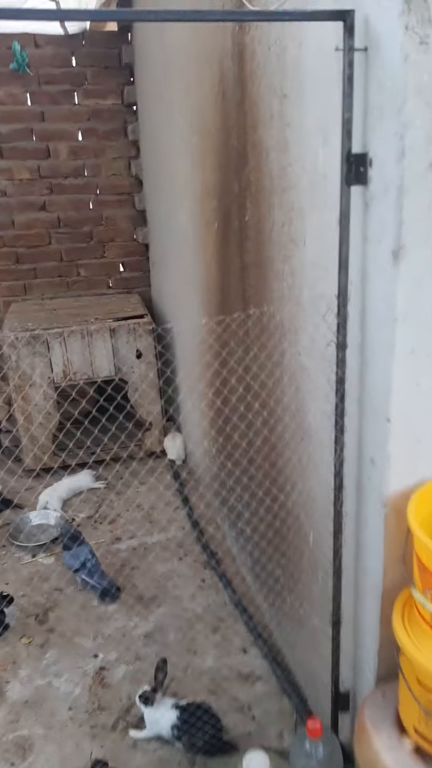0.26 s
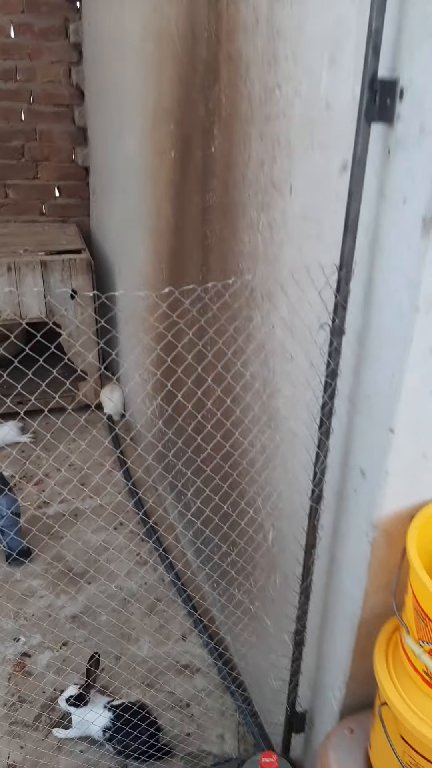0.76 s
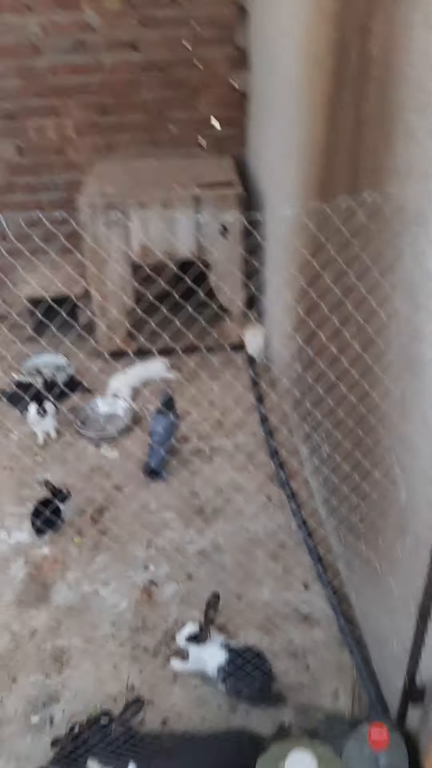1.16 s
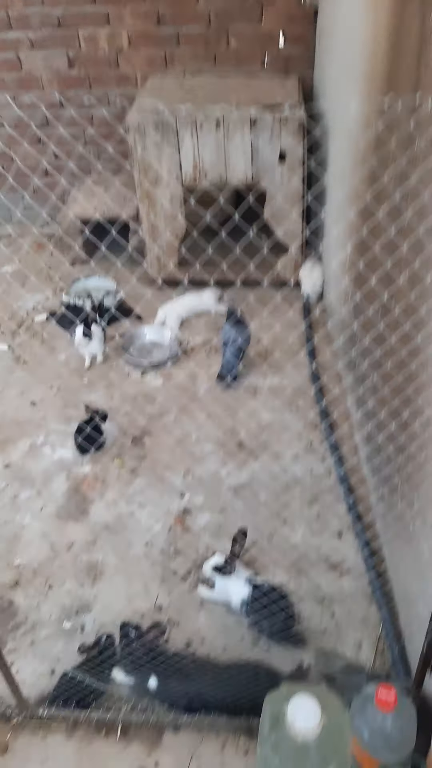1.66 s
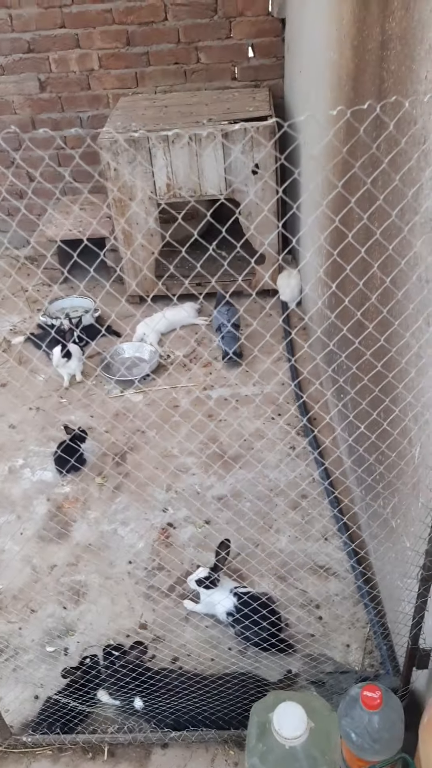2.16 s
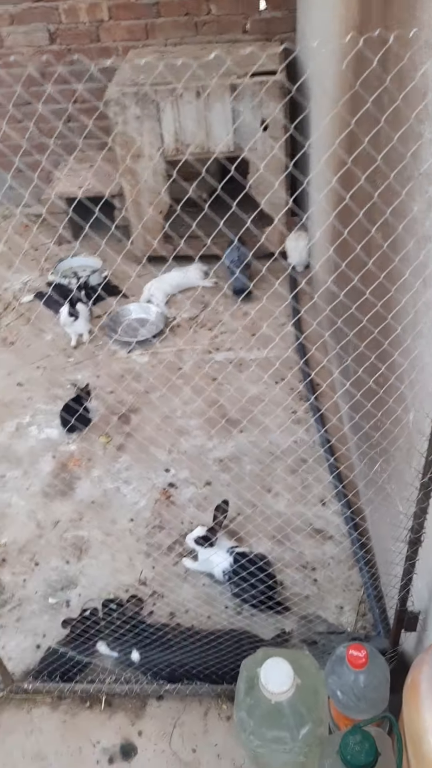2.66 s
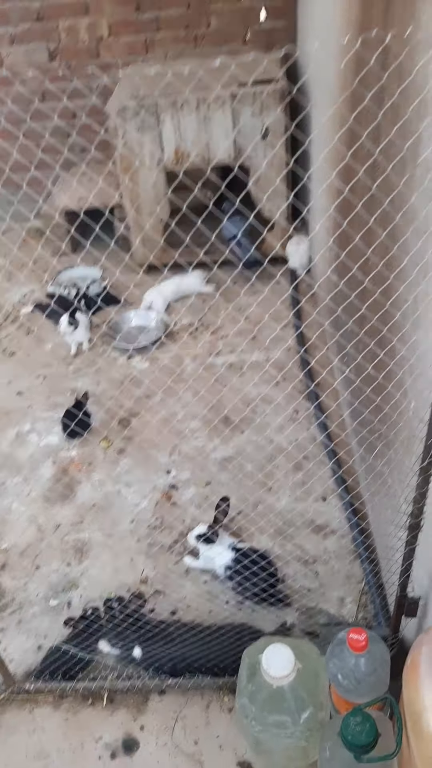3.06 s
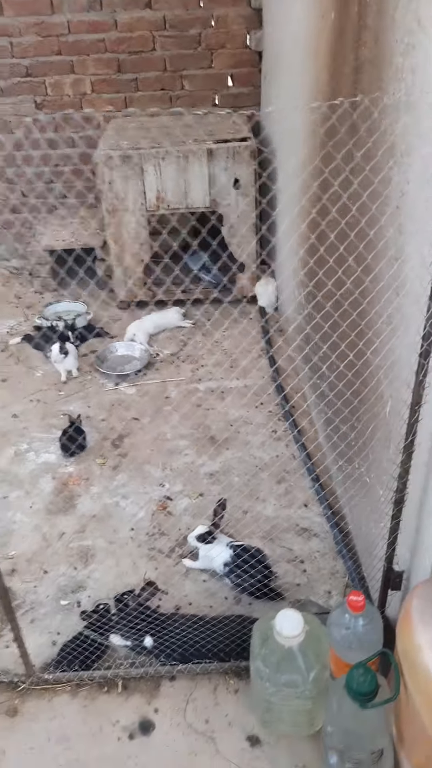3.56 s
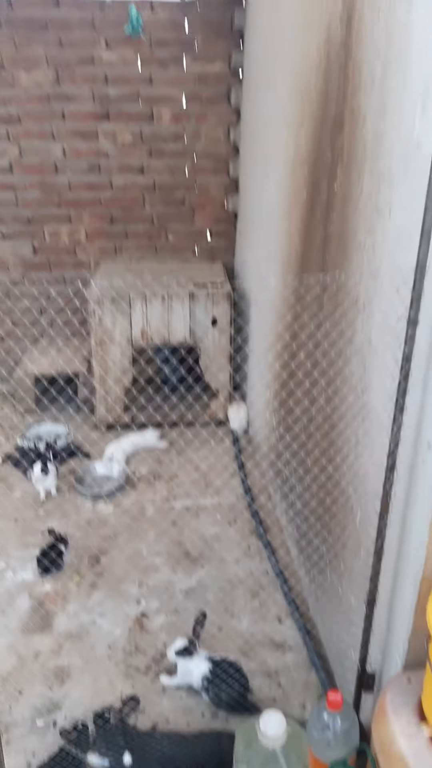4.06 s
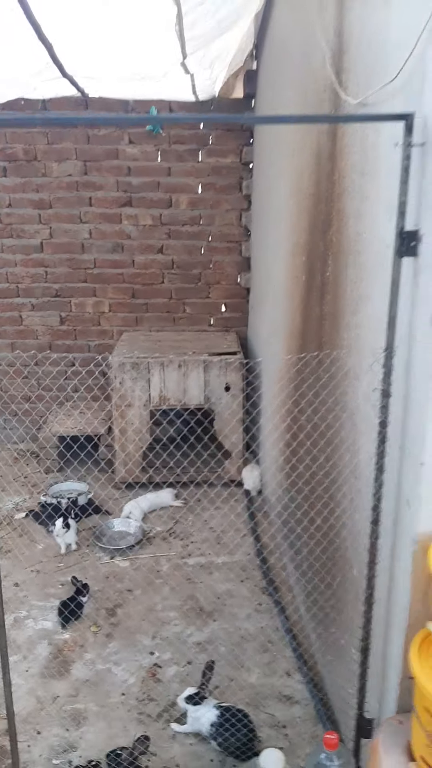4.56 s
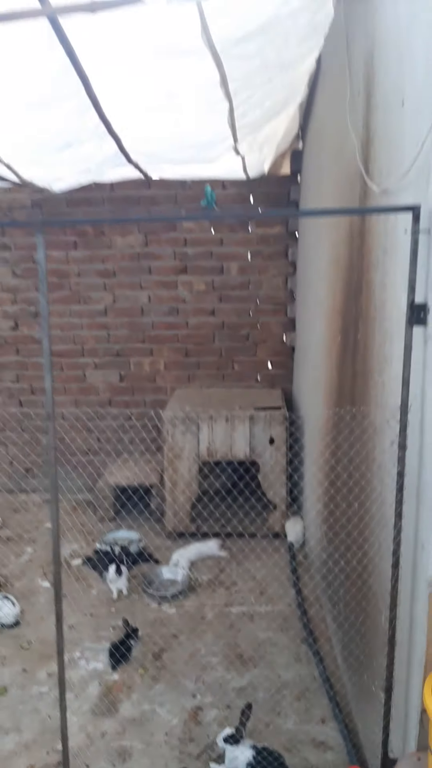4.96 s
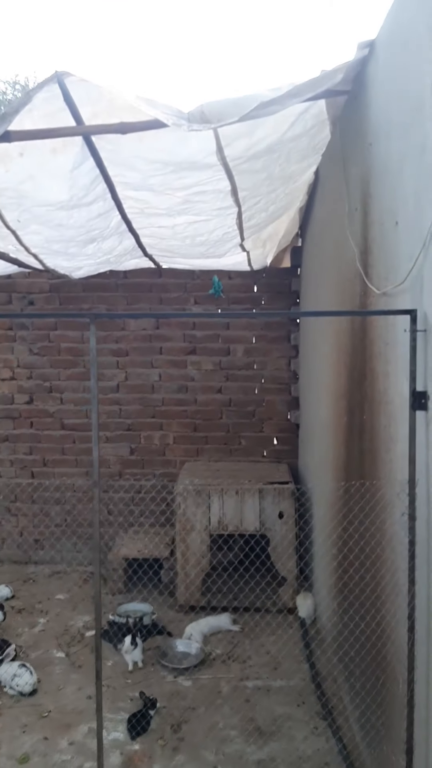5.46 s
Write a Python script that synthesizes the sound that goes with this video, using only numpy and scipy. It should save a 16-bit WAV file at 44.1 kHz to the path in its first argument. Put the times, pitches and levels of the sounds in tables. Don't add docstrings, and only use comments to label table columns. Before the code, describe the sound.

Pigeons land with wooden rattles and flapping feathers, sparrows whistle and squabble off brick walls, and a near coo swells at the very end.

```python
import sys
import numpy as np
from scipy import signal
from scipy.fft import rfft, irfft, next_fast_len
from scipy.io import wavfile
from scipy.ndimage import uniform_filter1d, map_coordinates

SR = 44100
rng = np.random.default_rng(int(sys.argv[2]) if len(sys.argv) > 2 else 0)


def to_wav(s):
    ch = np.atleast_2d(s).T
    pcm = np.round(np.clip(ch, -1, 1) * 32767)
    wavfile.write(sys.argv[1], SR, pcm.astype(np.int16))


def invert_db(x):
    u = np.asarray(x, float) / 20
    return 10 ** u


N = 252693


def rms_one(x):
    return x / np.sqrt(np.mean(x ** 2) + 1e-20)


def at_hz(points, hz):
    table_hz, value = np.transpose(points)
    return np.interp(np.log(hz), np.log(table_hz), value)


def drift(rate):
    knots = rng.standard_normal(N // 40 + 2002)
    r = np.exp(-80 * np.pi * rate / SR)
    slow = signal.lfilter([1], [1, -2 * r, r * r], knots)[2000:]
    return np.interp(np.arange(N) / 40, np.arange(len(slow)), rms_one(slow))


def resonance(x, hz, width_hz):
    r = np.exp(-np.pi * width_hz / SR)
    poles = [1, -2 * r * np.cos(2 * np.pi * hz / SR), r * r]
    return signal.lfilter([(1 - r * r) / 2, 0, (r * r - 1) / 2], poles, x + 1e-18)


def swell(s, rise, fall):
    at = np.arange(max(round((s - 4 * rise) * SR), 0), min(round((s + 8 * fall) * SR), N))
    t = at / SR - s
    return at, np.where(t < 0, np.exp(-.5 * (t / rise) ** 2), np.exp(-t / fall))


def soft_tones(puffs):
    out = np.zeros(N)
    for s, db, hz, rise, fall in puffs:
        at, shape = swell(s, rise, fall)
        out[at] += invert_db(db) * shape * np.cos(2 * np.pi * hz * (at / SR - s))
    return out


# (frequency [Hz], likeness [0-1])
PORT_LIKENESS = [(40, .8), (100, .94), (250, .955), (550, .75), (1200, .6), (3000, .3), (15000, .1)]


def coloured(spectrum):
    size = next_fast_len(N)
    hz = np.maximum(np.fft.rfftfreq(size, 1 / SR), 1)
    mid, side = rfft(rng.standard_normal((2, size)))
    alike = at_hz(PORT_LIKENESS, hz)
    ports = np.sqrt(1 + alike) * mid + np.sqrt(1 - alike) * side * [[1], [-1]]
    return rms_one(irfft(ports * invert_db(at_hz(spectrum, hz)), size)[:, :N])


# (frequency [Hz], density [dB per Hz])
YARD_COLOUR = [(15, -23), (25, -11), (97, 11), (200, 2), (285, -30), (575, -3.5), (1040, -5.5), (1520, -22),
               (3820, -18.5), (6380, -12.5), (8360, -23.5), (13200, -10), (16000, -33)]


def yard():
    yard_db, drone_hz, width_hz, drone_db = -74, 1050, 110, -82
    drone = resonance(rng.standard_normal(N), drone_hz, width_hz)
    drone = rms_one(resonance(drone, drone_hz, width_hz))
    swells_db = .8 * drift(3)
    air = invert_db(yard_db - 2.5 + swells_db) * coloured(YARD_COLOUR)
    return air + invert_db(drone_db + 0.5 * drift(2.3)) * drone


# (time [s], level [dB], rattle length [s], tail T60 [s], brightness [dB per octave])
LANDINGS = [(0.0, -33, 0.036, 0.92, 1), (0.925, -51.5, 0.12, 0.19, 0.84), (1.148, -77, 0.15, 0.23, 6.5),
            (2.301, -66.5, 0.097, 0.3, 1.5), (2.789, -52.5, 0.16, 0.35, -1.05),
            (3.269, -50, 0.076, 0.42, 0.36), (3.483, -71.5, 0.02, 0.31, -8.5),
            (3.733, -47, 0.095, 0.41, -1), (4.523, -49.5, 0.082, 0.45, 0.3), (4.85, -100, 0.11, 0.45, 13.5),
            (5.251, -45, 0.096, 0.49, -1.43), (5.424, -68, 0.092, 0.8, 4), (5.583, -57, 0.013, 0.76, -8.5),
            (5.606, -43.5, 0.09, 0.73, -0.4)]
# (frequency [Hz], density [dB per Hz])
BOARD_COLOUR = [(24, -50), (40, -21), (114, -5), (258, -0.5), (339, -7.5), (538, -8), (707, -9),
                (1100, -6.5), (2880, -28.5), (6000, -32), (7800, -31.5), (13200, -120)]
# (frequency [Hz], width [Hz], level [dB])
BOARD_MODES = [(120, 16, 2), (250, 30, 3), (305, 25, 0), (548, 30, 2), (950, 30, 1), (1125, 25, 4)]


def thumps():
    noise = coloured(BOARD_COLOUR)
    modes = sum(invert_db(db) * resonance(noise, hz, width) for hz, width, db in BOARD_MODES)
    noise = rms_one(noise + modes)
    edges = [58, 200, 450, 1000, 2200, 7000]
    rattle, t, out = invert_db(2.2 * drift(60)), np.arange(N) / SR, 0
    for low, high in zip(edges, edges[1:]):
        octaves = np.log2(np.sqrt(low * high) / 300)
        power_wanted = np.zeros(N)
        for s, db, length, t60, tilt_db in LANDINGS:
            start = round(s * SR)
            age = t[start:] - s
            attack_s = .003 * 2 ** (-.9 * octaves)
            attack = np.clip(age / attack_s + (s < .01), 0, 1)
            tail_db = -60 * np.maximum(age - length, 0) / (t60 * 2 ** (-.15 * octaves))
            power_wanted[start:] += (attack * invert_db(db + tilt_db * octaves + tail_db)) ** 2
        band = signal.sosfilt(signal.butter(2, [low, high], "band", fs=SR, output="sos"), noise)
        band = np.roll(band, round(2.1 * SR), axis=1)
        power = uniform_filter1d(np.mean(band ** 2, axis=0), size=1400)
        out = out + np.sqrt(power_wanted * power.mean() / power) * band
    return out * rattle


# (time [s], level [dB], frequency [Hz], rise [s], fall [s])
RINGING_BOARDS = [(.012, -40, 205, .004, .03), (.085, -42, 235, .008, .015), (.43, -57.5, 248, .03, .03),
                  (.006, -30, 251.6, 0.0019, 0.035), (.02, -37, 121, 0.0079, 0.024),
                  (.01, -44.5, 544, 0.0032, 0.063), (.18, -52, 287.5, 0.011, 0.036),
                  (.285, -50.5, 278.6, .012, 0.042), (3.747, -56, 203, .006, 0.05),
                  (5.27, -51.5, 452, 0.0081, 0.035), (5.295, -49, 297.4, 0.015, 0.083),
                  (5.3, -50, 143, 0.032, 0.035), (5.615, -50, 110, 0.0073, .04)]


def booms():
    return soft_tones(RINGING_BOARDS)


# (time [s], level [dB])
FEATHERS = [(0.0, -72), (.25, -54.5), (.32, -90), (.43, -60), (.78, -68.5), (1.0, -51), (1.12, -71.5),
            (1.43, -68.5), (2.05, -120), (2.33, -65.5), (2.8, -88.5), (2.9, -70), (3.5, -69.5),
            (3.77, -62.5), (4.52, -70.5), (4.87, -65), (5.43, -75.5), (5.73, -74)]
# (time [s], shuffle level [dB], low scuffle over shuffle [dB])
FEET = [(0.0, -42, 6), (.16, -51.5, -19), (.27, -54, 2), (0.351, -65.5, 7), (1.0, -79, 3.5),
        (1.12, -82, 11.5), (1.29, -67, 2), (1.45, -66, -6), (1.5, -80, 10), (1.9, -78, 4.5),
        (2.1, -82.5, 6), (2.73, -80.5, 6), (2.9, -83.5, 12.5), (3.22, -75.5, 4.5), (4.36, -75, 0.5),
        (5.2, -67.5, -5), (5.46, -85.5, 27), (5.73, -62.5, -7)]
# (frequency [Hz], density [dB per Hz])
FEATHER_COLOUR = [(1180, -16.5), (2000, -5), (2460, -6.5), (2830, -5), (3910, -1), (4230, -2), (4820, -3.5),
                  (6640, 0.5), (8780, -14.5), (15200, -4.5), (16000, -46)]
# (frequency [Hz], density [dB per Hz])
SHUFFLE_COLOUR = [(500, -11), (900, 13.5), (1300, 8.5), (1900, 7), (2600, 5), (4000, -26)]
# (frequency [Hz], density [dB per Hz])
SCUFFLE_COLOUR = [(120, -3), (250, 2.5), (450, 0), (700, -9), (1200, -28.5)]


def rustle():
    kick_rise_s, kick_fall_s = 0.029, 0.096
    shuffle_kick_db, scuffle_kick_db = -15.5, -11.5
    t, kicked, out = np.arange(N) / SR, np.zeros(N), 0
    for s, db, *_ in LANDINGS:
        at, shape = swell(s + kick_rise_s, kick_rise_s / 2, kick_fall_s)
        kicked[at] += invert_db(db) * shape
    s, pace_db, weight_db = np.transpose(FEET)
    feathers = invert_db(np.interp(t, *np.transpose(FEATHERS)))
    shuffle = np.hypot(invert_db(np.interp(t, s, pace_db)), invert_db(shuffle_kick_db) * kicked)
    scuffle = np.hypot(invert_db(np.interp(t, s, pace_db + weight_db)), invert_db(scuffle_kick_db) * kicked)
    layers = (FEATHER_COLOUR, feathers), (SHUFFLE_COLOUR, shuffle), (SCUFFLE_COLOUR, scuffle)
    for spectrum, level in layers:
        patches_db = 1.3 * drift(14)
        out = out + coloured(spectrum) * level * invert_db(-1.5 + patches_db)
    return out


# (peak time [s], air level [dB], fall [s], hollow frequency [Hz],
# hollow level [dB])
STROKES = [(.05, -62, 0.062, 1630, -50.5), (.35, -78, .3, 1720, -88), (.612, -59, 0.13, 1930, -63),
           (.898, -49.5, 0.018, 6500, -72), (.973, -57, 0.022, 2390, -38.5), (1.2, -65.5, 0.044, 4900, -83),
           (1.94, -74, 0.068, 435, -60.5), (.935, -90, 0.045, 1950, -51.5), (1.905, -90, .03, 14000, -57.5),
           (2.94, -86, 0.048, 800, -62), (5.69, -90, 0.034, 517, -51), (2.23, -94, 0.11, 4400, -71.5),
           (2.931, -62, 0.014, 724, -47.5), (3.292, -53, 0.0086, 6100, -52), (3.5, -98, 0.088, 655, -65.5),
           (4.57, -95, 0.079, 1950, -66), (4.819, -59, 0.0074, 6000, -62), (5.21, -64, 0.029, 6300, -81)]
# (peak time [s], air level [dB], fall [s], hollow frequency [Hz], hollow level [dB])
SWISHES = [(4.12, -90, 0.14, 12000, -72), (3.8, -90, .1, 12000, -70), (.309, -57.5, 0.049, 5630, -56),
           (1.003, -54, 0.013, 2460, -43), (1.62, -72, 0.11, 4100, -64), (1.9, -59.5, 0.026, 6500, -60.5),
           (1.926, -67, 0.016, 676, -55), (2.79, -81, 0.18, 6300, -83), (3.189, -61, 0.029, 5200, -65),
           (3.82, -61, 0.015, 2300, -63), (3.88, -61, 0.011, 1570, -63), (4.018, -61.5, 0.052, 5000, -70),
           (4.348, -64, 0.039, 696, -78), (5.409, -62, 0.034, 1720, -61.5)]
# (peak time [s], air level [dB], fall [s], hollow frequency [Hz], hollow level [dB])
CLAPS = [
    (.929, -52.5, 0.09, 1890, -63),
    (1.6, -73, 0.041, 6540, -68),
    (2.918, -49.5, 0.018, 6040, -47.5),
    (4.865, -62, 0.029, 6960, -81),
]


def wings():
    air, out = coloured(FEATHER_COLOUR) * invert_db(1.6 * drift(75)), np.zeros((2, N))
    white = coloured([(100, 0), (16000, 0)])
    for beats, rise_share in ((CLAPS, 0.092), (STROKES, 0.4), (SWISHES, 0.73)):
        for s, air_db, fall, hz, hollow_db in beats:
            at, shape = swell(s, rise_share * fall, fall)
            hollow = resonance(resonance(white[:, at], hz, 0.54 * hz), hz, 0.54 * hz)
            out[:, at] += shape * (invert_db(air_db) * air[:, at] + invert_db(hollow_db) * rms_one(hollow))
    return out


# (time [s], crack level [dB], knock level [dB], crack centre [Hz])
TICKS = [(.16, -42, -80, 6500), (.1775, -43, -80, 6500), (.056, -50, -80, 6000), (.082, -46, -80, 12500),
         (1.1394, -70, -55, 1500), (2.0017, -68, -62, 2500), (2.18, -59, -70, 5000),
         (2.325, -56, -53, 3000), (2.917, -45, -60, 9000), (3.261, -55, -52, 1500), (3.29, -52, -70, 9000),
         (3.589, -55, -75, 9000), (3.875, -56, -75, 7000), (4.06, -70, -60, 1500), (4.14, -55, -75, 10000),
         (4.295, -56, -56, 3000), (4.3384, -50, -47, 3000), (4.5105, -43, -62, 12500),
         (4.5246, -56, -54, 2500), (4.6124, -56, -66, 2500), (4.668, -54, -75, 7000),
         (5.2565, -55, -47, 1500), (5.604, -60, -52, 1800)]


def ticks():
    size = 600
    out, t = np.zeros(N + size), np.arange(size) / SR
    knock = np.sin(2 * np.pi * 750 * t) * np.exp(-t / .001)
    for s, crack_db, knock_db, hz in TICKS:
        crack = resonance(rng.standard_normal(size) * np.exp(-t / .0005), hz, 1.1 * hz)
        start = round(s * SR)
        out[start:start + size] += invert_db(crack_db) * crack / np.abs(crack).max() + invert_db(knock_db) * knock
    return (out - resonance(out, 9000, 3500))[:N]


def walls(x, smear=1.8):
    t60_s, smear_hz = .31, 150
    t = np.arange(round(.6 * SR)) / SR
    onset = np.clip(t / .005, 0, 1)
    echoes = rng.standard_normal((2, len(t))) * invert_db(-60 * t / t60_s) * onset
    mid, side = (part / np.sqrt(uniform_filter1d(np.abs(part) ** 2, size=50)) for part in rfft(echoes))
    echoes = irfft([mid + side, mid - side], len(t)) * onset * (t < .5)
    echoes /= np.sqrt(np.sum(echoes ** 2, axis=1, keepdims=True))
    x = map_coordinates(x, [np.arange(N) + smear * drift(smear_hz)], order=3)
    return signal.fftconvolve(x[None], echoes, axes=1)[:, :N]


def sing(notes, turn, bend, wobble_hz, flutter_db, glide_loss_db, softness=.7):
    out, wobble, flutter = np.zeros(N), wobble_hz * drift(266), invert_db(flutter_db * drift(100))
    for s, length, first_hz, last_hz, db in notes:
        at = np.arange(round(s * SR), min(round((s + length) * SR), N))
        u = (at / SR - s) / length
        first, slide, last = (np.tanh((part - turn) / bend) for part in (0, u, 1))
        hz = first_hz + (last_hz - first_hz) * (slide - first) / (last - first)
        shape = np.abs(np.sin(np.pi * u)) ** softness
        thinning_db = glide_loss_db * np.minimum(np.abs(np.gradient(hz)) * SR / 50000, 1.5)
        phase = 2 * np.pi * np.cumsum(hz + wobble[at]) / SR
        out[at] += invert_db(db - thinning_db) * shape * np.sin(phase)
    return out * flutter


# (time [s], length [s], first pitch [Hz], last pitch [Hz], level [dB])
SLIDES = [(3.556, 0.027, 2300, 3160, -63.5), (0.269, 0.032, 4150, 2790, -46.5),
          (0.454, 0.042, 4100, 2860, -53), (0.47, 0.058, 2850, 2710, -58.5),
          (0.716, 0.096, 2734, 2680, -61.5), (0.799, 0.048, 3850, 3500, -61.5),
          (0.743, 0.027, 3770, 3290, -64), (0.851, 0.045, 3950, 3770, -56.5),
          (1.095, 0.095, 3480, 2970, -64), (1.163, 0.051, 2950, 2710, -67.5),
          (1.453, 0.0365, 3710, 3300, -59), (0.297, 0.038, 2790, 2580, -52.5),
          (3.973, 0.041, 5020, 4820, -63), (4.04, 0.06, 3150, 2780, -70), (1.527, 0.042, 4620, 3890, -53),
          (1.634, .045, 3300, 2560, -60.5), (1.696, 0.03, 4670, 3820, -52.5),
          (1.729, 0.037, 3600, 2640, -60), (2.63, 0.067, 2390, 2085, -68), (3.572, 0.032, 3220, 3250, -59),
          (4.3, 0.054, 4860, 5090, -67), (4.436, 0.074, 4310, 3620, -66.5), (4.621, 0.035, 4430, 3490, -57),
          (5.645, .039, 4610, 5040, -65), (5.683, 0.038, 2610, 2883, -51.5)]


def near_sparrows():
    return sing(SLIDES, turn=.46, bend=.36, wobble_hz=110, flutter_db=3, glide_loss_db=3.5)


# (time [s], length [s], held pitch [Hz], last pitch [Hz], level [dB])
HELD = [(0.503, 0.066, 4020, 3880, -60.5), (0.673, 0.072, 3930, 3720, -60.5),
        (1.019, 0.085, 3986, 3310, -51.5), (1.396, 0.058, 3890, 3740, -65), (3.544, 0.072, 3855, 3700, -62),
        (1.572, 0.069, 3960, 3680, -62), (1.769, 0.085, 3950, 3810, -57.5),
        (3.733, 0.067, 4070, 3860, -58.5), (3.988, 0.066, 3960, 3400, -53), (4.964, 0.058, 3980, 3700, -51),
        (5.38, 0.065, 3920, 3680, -58.5)]
# (time [s], length [s], first pitch [Hz], last pitch [Hz], level [dB])
FALLS = [
    (.548, .082, 3980, 2550, -63.5),
    (1.44, .08, 3500, 2750, -64),
    (5.008, .038, 3800, 3450, -55),
    (5.428, .04, 3800, 2750, -61.5),
    (1.838, 0.04, 3880, 2600, -64.5),
    (3.9, .05, 3750, 2700, -68),
    (1.625, .055, 3800, 2800, -64),
]


def clear_sparrow():
    held = sing(HELD, turn=.8, bend=.24, wobble_hz=30, flutter_db=1.5, glide_loss_db=2, softness=.45)
    falls = sing(FALLS, turn=.46, bend=.6, wobble_hz=70, flutter_db=2.5, glide_loss_db=0, softness=.5)
    return held + falls


# (time [s], length [s], first pitch [Hz], last pitch [Hz], level [dB])
FAR_CALLS = [(0.913, 0.044, 4390, 4520, -48.5), (1.535, 0.056, 3344, 2810, -61.5),
             (1.659, 0.073, 3180, 3050, -66), (1.68, 0.012, 4600, 4060, -57),
             (2.215, .04, 4570, 4850, -64.5), (2.235, .05, 3800, 3770, -72),
             (1.861, 0.045, 2820, 2500, -71), (1.929, 0.024, 2710, 2360, -60.5),
             (1.992, 0.025, 2625, 2350, -69.5), (2.215, 0.033, 3050, 3110, -74),
             (2.262, 0.088, 3050, 2940, -69), (3.025, 0.025, 4500, 3200, -64),
             (3.048, 0.026, 3410, 2820, -64), (5.12, 0.035, 5290, 4470, -65.5),
             (3.158, 0.028, 2750, 2410, -64.5), (3.419, 0.054, 2600, 2230, -68),
             (3.507, 0.0394, 3230, 3550, -64.5), (3.63, .03, 2900, 2780, -68),
             (1.545, .05, 3050, 2770, -71), (4.94, .04, 3850, 3400, -65), (5.16, 0.034, 2680, 2610, -66),
             (3.94, 0.043, 5720, 5040, -60.5), (4.901, 0.037, 4650, 4280, -68),
             (4.934, 0.031, 3180, 3700, -56.5), (4.965, 0.025, 3590, 3100, -61),
             (4.986, 0.016, 3110, 2700, -58.5), (5.128, 0.048, 3560, 3200, -59.5),
             (5.155, 0.024, 2860, 2650, -62)]


def far_sparrows():
    return sing(FAR_CALLS, turn=.508, bend=.45, wobble_hz=130, flutter_db=4, glide_loss_db=0)


# (time [s], length [s], first pitch [Hz], last pitch [Hz], level [dB])
SQUABBLE = [(1.659, 0.016, 6200, 5600, -61.5), (2.2, 0.01, 6170, 5470, -60), (2.208, .014, 5400, 5500, -67),
            (2.245, 0.011, 6400, 4800, -59), (2.261, .008, 6630, 5800, -67), (2.317, 0.01, 5450, 6930, -65),
            (2.333, 0.0119, 3970, 3000, -48.5), (2.286, 0.016, 4120, 6060, -57),
            (2.302, 0.011, 5060, 3850, -46), (2.313, 0.0066, 4900, 2770, -55),
            (2.322, 0.0167, 3230, 3760, -52), (2.361, 0.042, 4340, 3030, -47),
            (3.015, 0.012, 5500, 4420, -54), (3.037, 0.0117, 3480, 2750, -64),
            (3.066, 0.015, 3590, 2750, -61), (3.076, 0.011, 5380, 4900, -60.5),
            (4.858, 0.011, 6050, 5000, -51), (4.86, 0.0195, 4740, 4060, -47),
            (5.023, 0.019, 5200, 3600, -51.5), (5.046, 0.02, 2990, 2590, -59)]


def squabble():
    return sing(SQUABBLE, turn=.508, bend=.6, wobble_hz=100, flutter_db=2.5, glide_loss_db=1.5)


# (time [s], level [dB], frequency
# [Hz], rise [s], fall [s])
COO_AND_BOARD_TONES = [(2.739, -61.5, 379, 0.0059, 0.017), (2.779, -68, 362, 0.011, 0.019),
                       (5.643, -39.5, 320, 0.0034, 0.0046), (5.657, -38.5, 337, 0.0019, 0.0066),
                       (5.673, -35.5, 343, 0.0019, 0.0064), (5.69, -37.5, 355, 0.0025, 0.0032),
                       (5.711, -19, 363.6, 0.0049, 0.0089), (5.727, -22.5, 380, 0.0018, 0.0098),
                       (5.445, -46, 328, 0.0035, 0.012), (5.47, -58, 406, 0.0098, 0.011),
                       (5.489, -52.5, 380, 0.0043, 0.0061), (5.561, -51, 328, 0.0058, 0.013)]


def coo():
    return soft_tones(COO_AND_BOARD_TONES)


# (time [s], throat resonance [Hz], level [dB])
CROON = [
    (5.0, 1630, -76),
    (5.05, 1660, -63),
    (5.2, 1680, -62.5),
    (5.3, 1640, -76),
    (5.378, 1580, -75),
]


def croon():
    s, hz, db = np.transpose(CROON)
    breath = coloured([(100, 0.002), (16000, 0)])
    throat = resonance(resonance(breath, hz.mean(), 430), hz.mean(), 430)
    return rms_one(throat) * invert_db(np.interp(np.arange(N) / SR, s, db, -150, -150) + 1.0 * drift(60))


# (time [s], left over right [dB])
SWING = [
    (0, 0.5),
    (.4, 1),
    (.9, 1.5),
    (1.3, 2.5),
    (2.0, 3),
    (2.9, 3),
    (3.6, 3.5),
    (4.4, 0.3),
    (5.2, 3),
    (5.73, 3.2),
]


def scene():
    near, far, quarrel, clear = near_sparrows(), far_sparrows(), squabble(), clear_sparrow()
    knocks = invert_db(7) * ticks()
    to_walls = invert_db(-.5) * near + invert_db(1.5) * far + invert_db(.5) * quarrel + invert_db(-6) * knocks
    echo = invert_db(-1.0) * walls(to_walls) + invert_db(-3) * walls(clear, smear=0.66)
    birds = near + invert_db(-2) * far + quarrel + clear + coo() + croon()
    mix = yard() + thumps() + booms() + rustle() + wings() + knocks + birds + echo
    left = invert_db(np.interp(np.arange(N) / SR, *np.transpose(SWING)) / 2)
    return mix * [left, 1 / left]


# (frequency [Hz], left over right [dB])
LEFT_LEAN = [(60, 0), (150, 4), (380, -2.5), (950, 1.5), (2380, -1.5), (5500, -7), (9000, 0), (14000, -2.5)]
# (frequency [Hz], left lead [radians])
LEFT_LEAD = [(40, -.3), (120, -.4), (300, -.15), (900, .3), (2000, .8), (4000, 1.5), (15000, 1.1)]


def microphone_ports(x):
    size = next_fast_len(N + 4096)
    hz = np.maximum(np.fft.rfftfreq(size, 1 / SR), 1)
    left = invert_db(at_hz(LEFT_LEAN, hz) / 2) * np.exp(.5j * at_hz(LEFT_LEAD, hz) * (hz > 20))
    return irfft(rfft(x, size) * [left, 1 / left], size)[:, :N]


def roll_off(x):
    return signal.sosfilt(signal.butter(12, 16510, fs=SR, output="sos"), x)


def record(dry):
    top_cut = signal.cheby2(14, 35, 16000, fs=SR, output="sos")
    rumble_cut = signal.butter(2, 38, "high", fs=SR, output="sos")
    mix = signal.sosfilt(np.vstack([top_cut, rumble_cut]), microphone_ports(dry))
    return roll_off(mix)


dry = scene()
out = record(dry)
to_wav(out)
```